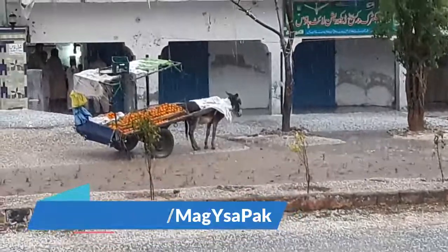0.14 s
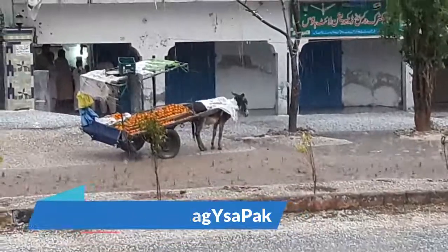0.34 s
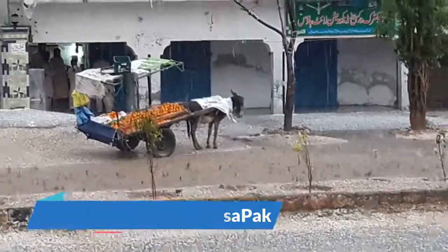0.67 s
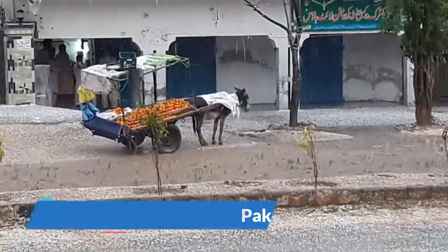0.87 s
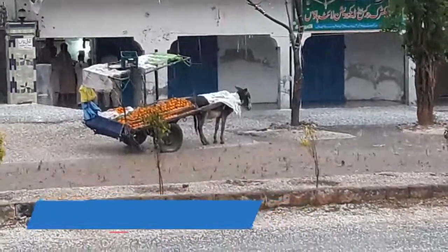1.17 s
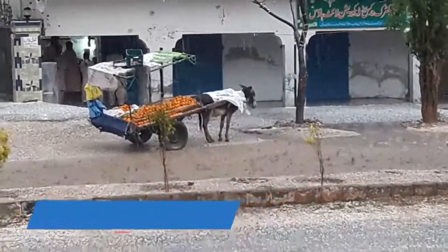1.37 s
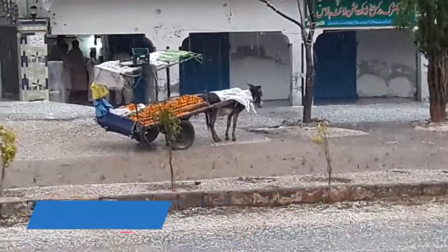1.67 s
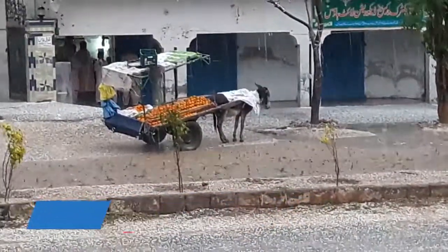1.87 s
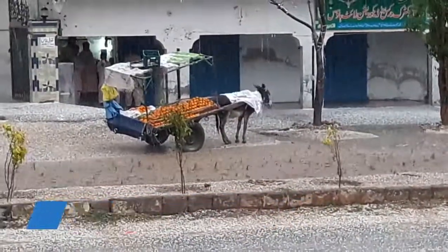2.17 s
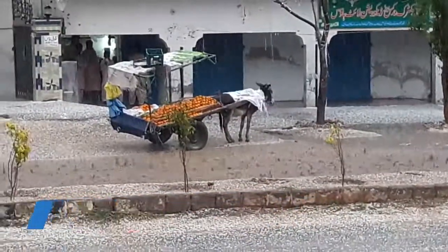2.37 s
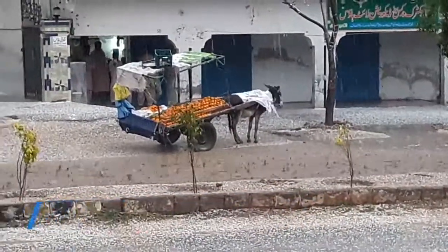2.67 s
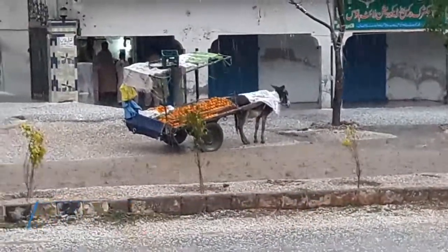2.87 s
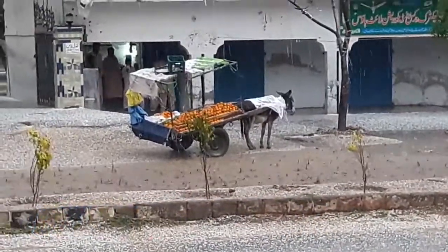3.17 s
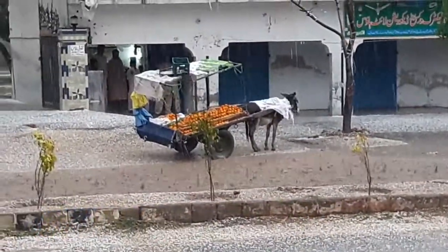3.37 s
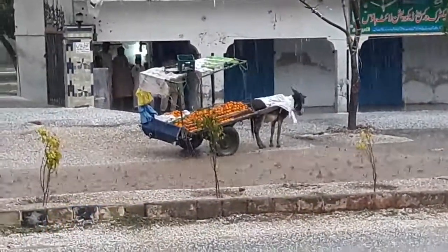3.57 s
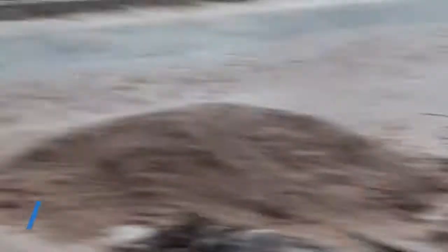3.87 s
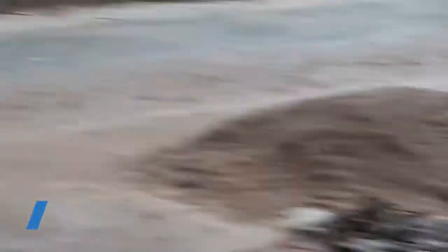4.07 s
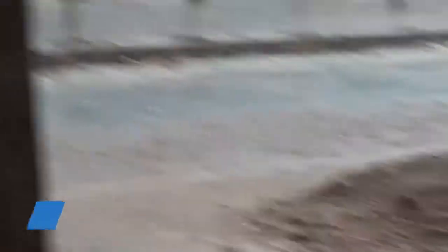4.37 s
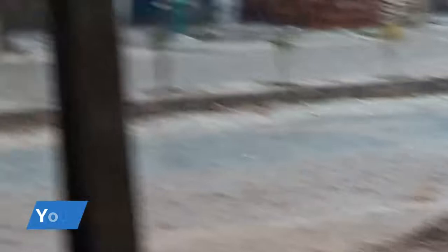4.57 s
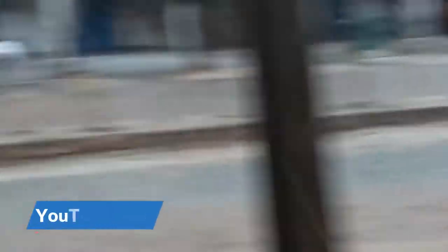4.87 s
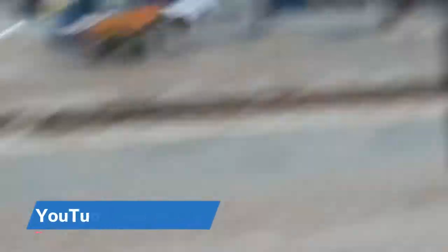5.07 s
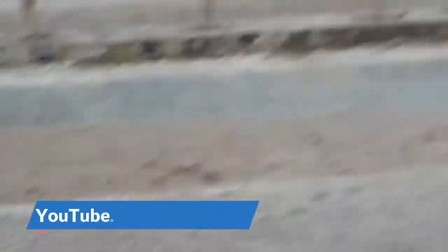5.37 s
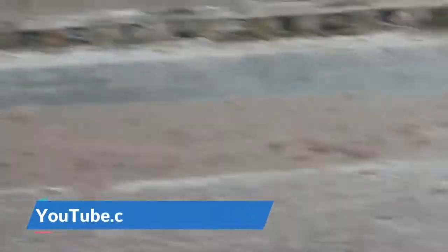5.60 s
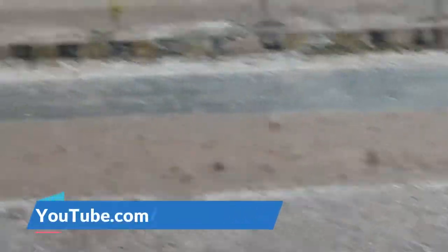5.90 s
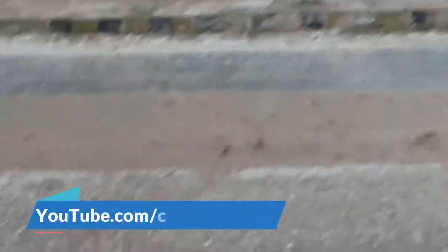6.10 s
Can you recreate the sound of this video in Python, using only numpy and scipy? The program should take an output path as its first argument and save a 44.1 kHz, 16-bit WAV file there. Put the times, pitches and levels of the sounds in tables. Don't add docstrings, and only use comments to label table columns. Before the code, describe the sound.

Dense hail and rain hammer paving and sheet roofs; a slow engine putters, a horn blares long then short, and stones tick close by.

```python
import sys
import numpy as np
from scipy import signal
from scipy.fft import rfft, irfft
from scipy.io import wavfile
from scipy.ndimage import uniform_filter1d, minimum_filter1d

SR = 44100
rng = np.random.default_rng(int(sys.argv[2]) if len(sys.argv) > 2 else 0)


def unload_wav(signal):
    wavfile.write(
        sys.argv[1],
        SR,
        np.round(np.clip(np.atleast_2d(signal).T, -1, 1) * 32767).astype(np.int16),
    )


def convert_level_to_amplitude(level_db):
    exponent = np.asarray(level_db, float) / 20
    return 10 ** exponent


N = 275184
T_S = np.arange(N) / SR
CUT_S, BACK_S = 0.2487, 0.5925


def rms_one(x):
    return x / np.sqrt(np.mean(x ** 2) + 1e-20)


def at_hz(points, hz):
    point_hz, point_db = np.transpose(points)
    return np.interp(np.log(hz + 1), np.log(point_hz), point_db)


def drift(rate_hz):
    r = np.exp(-80 * np.pi * rate_hz / SR)
    noise = rng.standard_normal(N // 40 + 2002)
    slow = signal.lfilter([1], [1, -2 * r, r * r], noise)[2000:]
    return np.interp(np.arange(N) / 40, np.arange(len(slow)), rms_one(slow))


def impacts(per_s, spread_db):
    size_db = spread_db * np.minimum(rng.exponential(1, (2, N)), 5)
    sizes = convert_level_to_amplitude(size_db) * rng.standard_normal((2, N))
    return rms_one(sizes * (rng.random((2, N)) < per_s / SR))


def resonator(hz, t60_s):
    return convert_level_to_amplitude(-60 / (t60_s * SR)), 2 * np.pi * hz / SR


# (frequency [Hz], left-right likeness [0-1])
LIKENESS = [(40, .75), (100, 0.98), (300, 0.97), (430, 0.65), (800, .75), (1050, 0.82), (1300, 0.17),
            (1800, 0.23), (2200, 0.82), (2500, 0.22), (3500, 0.41), (4500, 0.16), (7000, 0.073)]


def diffuse(showers, spectrum, patchy_db, count):
    hz = np.fft.rfftfreq(N, 1 / SR)
    centre, side = rfft(showers) * convert_level_to_amplitude(at_hz(spectrum, hz))
    alike = np.clip(at_hz(LIKENESS, hz), 0, 0.99)
    pair = np.sqrt(1 + alike) * centre + np.sqrt(1 - alike) * side * [[1], [-1]]
    low_hz, high_hz = spectrum[0][0], spectrum[-1][0]
    place = count * np.log(hz / low_hz + 1e-9) / np.log(high_hz / low_hz)
    out, neighbour = 0, drift(7.0)
    for k in range(count + 1):
        own = drift(17.0)
        band = np.clip(1 - abs(place - k), 0, 1)
        swell = convert_level_to_amplitude(patchy_db * (own + 1.05 * neighbour))
        out = out + swell * irfft(pair * band, N)
        neighbour = own
    return out / np.sqrt(np.mean(out.mean(axis=0) ** 2))


def bass_db(first_shot_db):
    dip_db, cut_db, settle_s = -2.5, -5.5, 0.41
    since_s = np.maximum(T_S - 1.675, 0)
    filter_db = cut_db + dip_db * np.exp(-since_s / settle_s)
    return first_shot_db * (T_S < BACK_S) + np.minimum(since_s * 50, 1) * filter_db


# (frequency [Hz], density [dB per Hz])
RUMBLE_COLOUR = [(15, -52), (25, -30.5), (43, -24.5), (211, 0.5), (283, -2.5), (339, -3), (552, -6.5),
                 (700, 0), (910, -33), (1540, -120)]


def rumble_and_hum():
    hum_hz, hum_db, waver_db = 280.3, -5, 1.2
    first_shot_share = 0.5
    rumble = diffuse(rng.standard_normal((2, N)), RUMBLE_COLOUR, patchy_db=1.6, count=6)
    tone = np.sqrt(2) * np.sin(2 * np.pi * hum_hz * T_S)
    hum = tone * convert_level_to_amplitude(hum_db + waver_db * drift(5.0))
    hum = hum * np.where(T_S > BACK_S, 1, first_shot_share)
    return convert_level_to_amplitude(-29 + bass_db(-1.5)) * (convert_level_to_amplitude(2.5) * rumble + hum)


# (start [s], end [s], start level [dB], end level [dB])
HORN = [
    (0.598, 1.431, -32, -32.5),
    (1.718, 2.123, -29.5, -37.5),
]
# (multiple [1], level [dB])
HORN_TONE = [(1, -1.5), (2, -11.5), (3, -6.5), (4, -14), (5, -3.5), (6, 2), (7, 3)]
# (multiple [1], level [dB])
HIGH_HORN_TONE = [(1, -11), (2, -11.5), (3, -6.5), (4, -2.5), (5, 3.5)]


def horn():
    horn_hz, edge_s, high_ratio, waver_db = 350.6, 0.027, 1.258, 1.2
    blasts = 0
    for start_s, end_s, start_db, end_db in HORN:
        level = convert_level_to_amplitude(np.interp(T_S, [start_s, end_s], [start_db, end_db]))
        inside_s = np.minimum(T_S - start_s, end_s - T_S)
        blasts = blasts + level * np.clip(inside_s / edge_s + 0.5, 0, 1) ** 2
    phase = 2 * np.pi * np.cumsum(horn_hz + 1.5 * drift(3.0)) / SR
    high = [(k * high_ratio, db) for k, db in HIGH_HORN_TONE]
    tone = 0
    for k, db in list(HORN_TONE) + high:
        tone = tone + np.sqrt(2) * convert_level_to_amplitude(db + waver_db * drift(4.6)) * np.sin(k * phase)
    return blasts * tone


# (first firing [s], last firing [s])
IDLE = [
    (.02, 0.21),
    (.643, 2.658),
    (2.7604, 4.2805),
    (4.3836, 6.2005),
]
# (time [s], level over usual [dB])
ODD_FIRINGS = [(.64, 4.5), (1.045, 4), (1.25, -1.5), (1.35, 6), (1.85, -16), (3.165, -0.5), (3.57, -0.5),
               (3.67, -6.5), (3.77, 5.5), (3.875, -8), (4.18, -4.5), (4.38, 1.5), (4.585, 1.5), (4.99, 3),
               (5.8, 1.5), (6.0, 1.5)]


def firings():
    per_s, usual_db, spread_db = 9.9, -21, 1.3
    s = np.concatenate([np.linspace(a, b, 1 + round((b - a) * per_s)) for a, b in IDLE])
    db = usual_db + spread_db * rng.standard_normal(len(s))
    for when_s, odd_db in ODD_FIRINGS:
        db[np.argmin(abs(s - when_s))] = usual_db + odd_db
    fired = np.zeros(N)
    fired[np.round(s * SR).astype(int)] = convert_level_to_amplitude(db)
    return fired + 1e-18


# (delay [s], level [dB])
WALL_ECHOES = [(0.0146, -1.5), (0.022, -23), (.047, -12.5), (.075, -6.5)]
# (frequency [Hz], level [dB], t60 [s])
PIPE = [(89.8, -17.5, 0.59), (127.8, -15, 0.4), (166, -26, .3), (208.9, -12.5, 0.81), (240, -22.5, .3)]


def engine():
    fired = firings()
    echoes = sum(convert_level_to_amplitude(db) * np.roll(fired, round(delay_s * SR)) for delay_s, db in WALL_ECHOES)
    turn = (np.pi * 170.0 * np.arange(-400, 401) / SR) ** 2
    push = (1 - 2 * turn) * np.exp(-turn)
    out = convert_level_to_amplitude(1.0) * signal.fftconvolve(fired + echoes, push, "same")
    for hz, level_db, t60_s in PIPE:
        r, w = resonator(hz, t60_s)
        out += convert_level_to_amplitude(level_db) * signal.lfilter([1, -r * np.cos(w)], [1, -2 * r * np.cos(w), r * r], fired)
    return out * convert_level_to_amplitude(bass_db(-2))


# (time [s], pitch [Hz], peak level [dB])
PINGS = [
    (3.099, 4000, -11),
    (5.34, 3500, -15),
]


def pings():
    t60_s, out = 0.05, 0
    for s, hz, peak_db in PINGS:
        decay = convert_level_to_amplitude(peak_db - 60 * np.maximum(T_S - s, 0) / t60_s)
        out = out + decay * np.sin(2 * np.pi * hz * (T_S - s)) * (T_S > s)
    return out


# (time [s], peak level [dB], left minus right beyond a fixed 3.5 dB lean to the left [dB])
STONES = [(.9677, -27, 5.5), (1.0291, -27.5, 6), (1.4207, -24.5, 9), (1.5414, -25, 7), (1.5948, -18.5, 9),
          (2.0947, -28, 4), (2.3027, -10.5, 0.5), (3.6631, -28.5, 11.5), (3.924, -11.5, 8),
          (4.132, -22, 11.5), (4.2912, -21.5, 9.5), (4.3994, -27.5, 11), (4.6728, -27.5, 10),
          (4.7576, -25.5, 5), (4.8898, -13, 8.5), (5.7913, -29, 7), (5.888, -29.5, 8), (5.9978, -26, 7.5)]


def hailstones():
    bright, decay_s = 0.15, 0.0007
    out, t = np.zeros((2, N)), np.arange(400) / SR
    for s, peak_db, pan_db in STONES:
        burst = rng.standard_normal(400) * np.exp(-t / decay_s)
        tick = signal.lfilter([1, -bright], [1, -0.6], burst / abs(burst).max())
        at = round((s + 0.0008) * SR)
        out[:, at:at + 400] += convert_level_to_amplitude(peak_db) * tick * convert_level_to_amplitude([[pan_db / 2 + 0.5], [-3 - pan_db / 2]])
    band = signal.butter(2, [3500, 15500], "band", fs=SR, output="sos")
    return signal.sosfilt(band, out + 1e-18)


# (time [s], drumming strength [dB], nearness as extra spray [dB])
POUR = [(0, -13.5, 6.5), (.245, -12, 6.5), (.76, -13, 0), (1.6, -12.5, -0.5), (2.2, -11.5, -1.5),
        (2.6, -10.5, 0.5), (2.75, -14, 1), (3.1, -12, 2.5), (3.4, -12.5, 3.5), (3.8, -11.5, 1.5),
        (4.3, -12, 2.5), (4.6, -10, 1), (5.0, -12, 2.5), (5.6, -12.5, 0.5), (5.8, -10, 0),
        (6.24, -12.5, -0.5)]
# (time [s], level [dB], length [s])
GUSTS = [(.79, 4, .05), (0.841, -3, 0.042), (1.024, 1, .04), (1.227, -2, .06), (2.246, -3.5, .04),
         (3.095, 4.5, 0.028), (3.17, -2.5, 0.13), (3.31, 2, 0.054), (3.53, 3.5, .05), (3.658, -2.5, .05),
         (3.79, 0, 0.036), (3.836, -2, .04), (4.039, -2, .05), (4.08, 2, .04), (4.517, -3.5, 0.073),
         (4.737, -4.5, 0.034), (4.93, 0.5, .06), (5.349, 4, .04), (5.51, 5, 0.062), (5.58, -2.5, 0.048),
         (5.74, -2.5, .05), (5.825, -2, .06)]


def weather():
    s, strength_db, near_db = np.transpose(POUR)
    drum_db = np.interp(T_S, s, strength_db)
    for gust_s, db, length_s in GUSTS:
        drum_db = drum_db + db * np.exp(-(2 * (T_S - gust_s) / length_s) ** 2)
    return drum_db, np.interp(T_S, s, near_db)


# (frequency [Hz], level [dB])
ROOF = [(860, -1.5), (1050, -2), (1580, 1.5), (1750, 3), (1900, -0.5), (2450, -3), (3900, -4.5)]


def roof_hail():
    drum_db, _ = weather()
    out = np.zeros((2, N))
    for hz, level_db in ROOF:
        r, w = resonator(hz, 35.0 / hz)
        struck = impacts(70, 2.2) + 1e-18
        near, far = signal.lfilter([0, np.sin(w)], [1, -2 * r * np.cos(w), r * r], struck)
        out += convert_level_to_amplitude(level_db) * rms_one(near + 0.51 * far * np.array([[1], [-1]]))
    return convert_level_to_amplitude(drum_db - 12.0) * rms_one(out)


# (frequency [Hz], density [dB per Hz])
RAIN = [(260, -29), (450, -18.5), (593, -17.5), (791, -5.5), (1030, -2), (1360, -5.5), (1540, -1.5),
        (1810, 0.5), (2180, -6), (2470, -4.5), (2950, -10), (3980, -14), (5800, -22), (8040, -33),
        (9000, -46.5), (11700, -58), (19800, -120)]
# (frequency [Hz], density [dB per Hz])
SPRAY = [(4500, -21), (7000, -0.5), (8050, -5.5), (9070, -11), (11500, -12.5), (13500, -17.5),
         (15000, -17.5), (15700, -24.5)]


def downpour():
    drum_db, near_db = weather()
    splash_db = drum_db - 13 + 0.64 * near_db
    spray_db = 0.81 * drum_db - 30 + near_db
    roar = diffuse(impacts(14000, 0.9), RAIN, patchy_db=0.73, count=12)
    high_pass = signal.butter(2, 2900, "high", fs=SR, output="sos")
    splash = signal.sosfiltfilt(high_pass, roar)
    spray = diffuse(impacts(9000, 1.6), SPRAY, patchy_db=0.76, count=4)
    drumming = convert_level_to_amplitude(drum_db - 0.3) * (roar - splash)
    return drumming + convert_level_to_amplitude(splash_db + 12) * splash + convert_level_to_amplitude(spray_db + 1.5) * spray


def scene():
    rain = downpour() + roof_hail()
    shaded_band = signal.butter(1, (1500, 3610), "band", fs=SR, output="sos")
    roofs = signal.sosfiltfilt(shaded_band, rain)
    rain = rain - 0.41 * roofs * (T_S < BACK_S)
    return rain + hailstones() + pings() + rumble_and_hum() + engine() + horn()


# (frequency [Hz], left minus right [dB])
PORTS = [(60, -2.5), (400, -1), (800, -1.5), (1700, 0.5), (2700, -1), (4000, -5), (5500, -4), (7200, -1.5),
         (8200, 13), (9200, 7.5), (11500, 9.5), (15000, 6.5)]


def two_ports(dry):
    lead_s, lead_rad, bass_cut_hz = 6e-5, 0.17, 42
    hz, side = np.fft.rfftfreq(N, 1 / SR), np.array([[0.5], [-0.5]])
    colour = convert_level_to_amplitude(side * at_hz(PORTS, hz))
    lead = np.exp(1j * side * (2 * np.pi * hz * lead_s + lead_rad))
    ratio = hz / bass_cut_hz
    bass_cut = ratio ** 2 / np.sqrt(1 + ratio ** 4)
    return irfft(rfft(dry) * colour * lead * bass_cut, N)


def limiter(x, ceiling_db, release_db_s):
    slope_db = release_db_s * T_S
    over_db = np.maximum(20 * np.log10(abs(x).max(axis=0) + 1e-9) - ceiling_db, 0)
    held_db = np.maximum.accumulate(over_db + slope_db) - slope_db
    ahead_db = -minimum_filter1d(-held_db, size=65)
    return x * convert_level_to_amplitude(-uniform_filter1d(ahead_db, size=65))


def top_cut(x):
    return signal.sosfilt(signal.butter(12, 15810, fs=SR, output="sos"), x)


def record(dry):
    fade_s = 0.16
    heard = limiter(two_ports(dry), ceiling_db=-0.15, release_db_s=400.0)
    fade = np.clip(0.08 + (T_S - BACK_S) / fade_s, 0, 1) * (T_S >= BACK_S)
    return top_cut(heard * np.where(T_S < CUT_S, 1, fade))


dry = scene()
out = record(dry)
unload_wav(out)
```